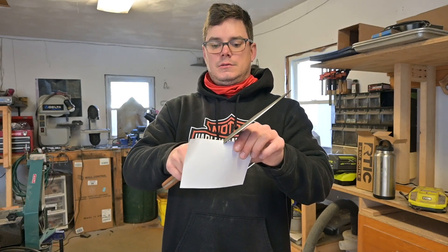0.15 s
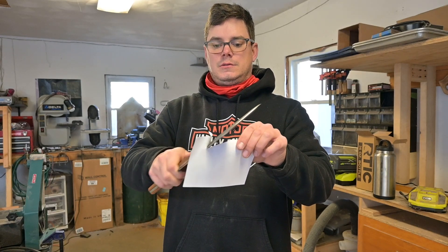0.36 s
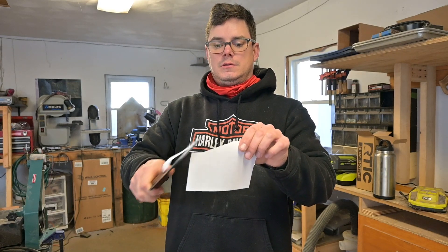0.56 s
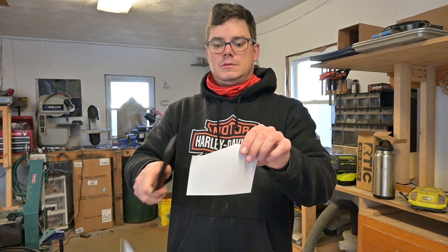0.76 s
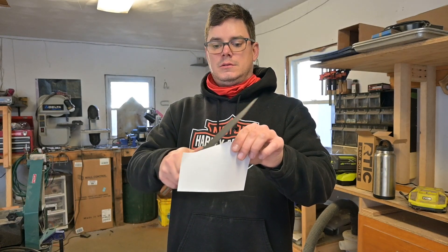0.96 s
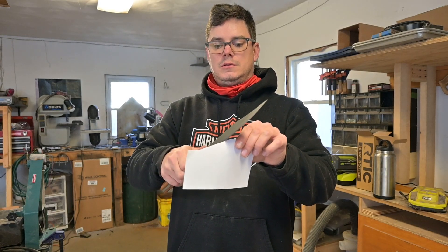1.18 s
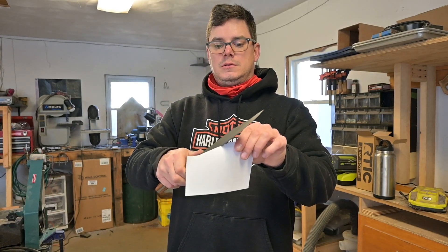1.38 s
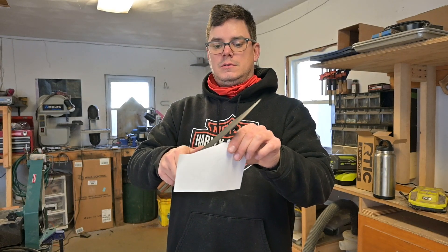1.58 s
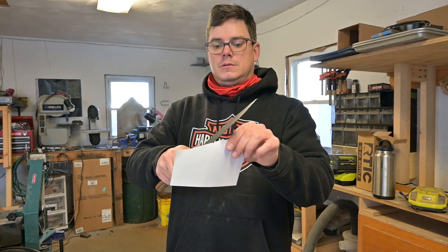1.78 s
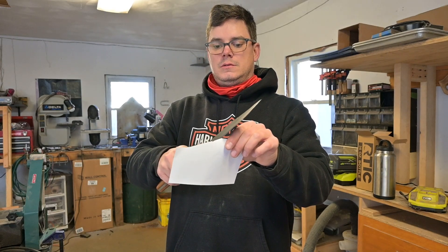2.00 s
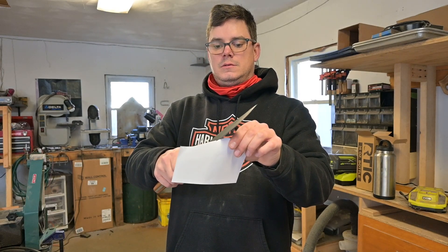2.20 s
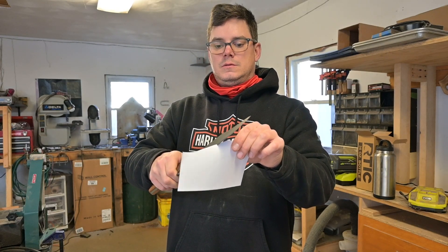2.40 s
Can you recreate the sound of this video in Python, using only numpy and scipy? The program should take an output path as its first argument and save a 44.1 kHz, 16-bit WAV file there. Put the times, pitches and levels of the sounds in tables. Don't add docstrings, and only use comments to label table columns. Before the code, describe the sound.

A knife slices a held sheet of paper, its crisp hiss swelling into a sharp rip; after a quiet gap come softer sawing strokes and papery knocks, close microphone in a quiet workshop.

```python
import sys
import numpy as np
from scipy import signal
from scipy.fft import rfft, irfft, next_fast_len
from scipy.io import wavfile
from scipy.ndimage import uniform_filter1d

SR = 44100
rng = np.random.default_rng(int(sys.argv[2]) if len(sys.argv) > 2 else 0)


def natural_amplitude(level_db):
    exponent = np.asarray(level_db, float) / 20
    return 10 ** exponent


def output_pcm(signal):
    pcm = np.clip(np.atleast_2d(signal).T, -1, 1) * 32767
    wavfile.write(sys.argv[1], SR, np.round(pcm).astype(np.int16))


N = 108045


def unit(x):
    return x / np.sqrt(np.mean(x ** 2) + 1e-20)


def along(points, hz):
    f, value = np.transpose(points)
    return np.interp(np.log(hz + 1), np.log(f + 1), value)


def filtered(x, response):
    m = next_fast_len(N + 8192)
    return irfft(rfft(x, m) * response(np.fft.rfftfreq(m, 1 / SR)), m)[..., :N]


def moving(x, gain_db):
    hz, s, z = signal.stft(x, SR, nperseg=256, noverlap=192)
    z = z * natural_amplitude(gain_db(hz[:, None] + 1, s))
    return signal.istft(z, SR, nperseg=256, noverlap=192)[1][:N]


def patches(shape):
    field = uniform_filter1d(rng.standard_normal(shape), size=5, axis=0)
    return unit(uniform_filter1d(field, size=8, axis=1))


def crackle(rate_hz, spike_db):
    hit = rng.random(N) < rate_hz / SR
    size = np.minimum(rng.exponential(size=N), 3)
    clicks = unit(hit * rng.standard_normal(N) * natural_amplitude(spike_db * size))
    return unit(clicks + 1.1 * rng.standard_normal(N))


def ringing(x, modes):
    def response(f):
        total = 1
        for hz, width_hz, db in modes:
            damping = 1j * f * width_hz
            total = total + natural_amplitude(db) * damping / (hz * hz - f * f + damping)
        return total
    return filtered(x, response)


def blade():
    # t/s, pressure level/dB, keenness/dB per octave
    strokes = [
        [(0.0, -41.5, -3.5), (0.038, -38.5, -3), (0.096, -39.5, -1), (0.176, -30.5, -3), (0.192, -33.5, -1),
         (0.3, -27.5, 3)],
        [(0.3, -27, 3), (0.34, -25.5, 4.5), (0.412, -27.5, 0.5), (0.446, -25.5, -0.5)],
        [(0.446, -22, -4.5), (0.48, -18.5, -1.5), (0.533, -18.5, 1.5), (0.537, -23, 0), (0.546, -24, -9.5)],
        [(1.128, -73, -2), (1.136, -46.5, 0), (1.17, -43.5, -1), (1.208, -36, 2), (1.268, -44.5, -1.5),
         (1.314, -33, 1.5), (1.34, -44, 5.5)],
        [(1.34, -43, -1), (1.376, -39, 5), (1.396, -53, -12), (1.408, -39.5, 3), (1.49, -37, 0),
         (1.502, -46, -2), (1.58, -60, -12)],
        [(2.06, -66.5, 7), (2.078, -49.5, -2.5), (2.156, -37, 0.5), (2.21, -40.5, 2.5), (2.3, -36, 0),
         (2.305, -55, -6), (2.33, -48, -40)],
        [(2.335, -87.5, 12), (2.341, -33.5, 1.5), (2.373, -44, -1.5), (2.377, -49, -1), (2.396, -60, -1),
         (2.402, -33, -10), (2.421, -46.5, 3.5), (2.429, -57.5, -4), (2.45, -64.5, 0.5)],
    ]
    rates_hz, spikes_db = [9000, 9150, 6000, 2920, 3090, 4280, 2530], [1.8, 1.8, 1.2, 2.2, 2.2, 2.2, 1.5]
    # f/Hz, level/dB
    fibre, rip, saw = [(150, -28), (400, -9.5), (900, -2), (2200, 4.5), (4500, 0.5), (8500, -1.5),
                       (13000, -9), (16000, -16.5)], [(300, -25.5), (1000, -3), (1700, -6), (2400, -1), (6000, 1),
                                      (8500, -1.5), (16000, -13)], [(300, -7.5), (900, 3), (2100, 4), (3000, -3.5),
                                                   (6000, -1), (8700, -3), (12500, -11.5), (16000, -16)]
    # f/Hz, width/Hz, level over the fibre noise/dB
    drawn, ripped, sawn = [(1550, 370, -4), (2100, 150, -6), (3850, 120, 1), (4590, 200, -0.5)], [(2390, 110, 4), (3820, 83, 0.93), (5500, 91, 0.78),
                                          (6140, 200, 0.7)], [(960, 180, -2.5), (2100, 63, 4.5), (2644, 89, 3),
                                                          (3814, 360, -0.5), (6180, 190, -12),
                                                          (8740, 620, -5)]
    grains = [fibre] * 2 + [rip] + [saw] * 4
    mode_sets = [drawn] * 2 + [ripped] + [sawn] * 4
    pivot_hz, patchy_db, keenest_db = 4000, 2.5, 5
    out, t = np.zeros(N), np.arange(N) / SR
    for rows, rate_hz, spike_db, grain, modes in zip(strokes, rates_hz, spikes_db, grains, mode_sets):
        s, level_db, keen_db = np.transpose(rows)
        keen_db = np.clip(keen_db, -keenest_db, keenest_db)

        def colour(f, u):
            octaves = np.log2(np.maximum(f, 1500) / pivot_hz)
            tilt_db = np.interp(u, s, keen_db) * octaves
            return along(grain, f) + tilt_db + patchy_db * patches((len(f), len(u)))

        cut = ringing(moving(crackle(rate_hz, spike_db), colour), modes)
        out += natural_amplitude(np.interp(t, s, level_db, -150, -150)) * cut
    return out


def singing(rows, width, rate_hz, spike_db):
    s, hz, level_db = np.transpose(rows)

    def band(f, u):
        pitch_hz = np.interp(u, s, hz)
        offset = np.log(f / pitch_hz) / width
        power_db = np.interp(u, s, level_db, -150, -150) - 10 * np.log10(pitch_hz * width / SR)
        return power_db - 40 * np.log10(1 + offset ** 2)

    return moving(crackle(rate_hz, spike_db), band)


def sheet_tones():
    # t/s, pitch f/Hz, level/dB
    belly, steel_edge, cut_strip = [(0, 2200, -50), (.1, 1900, -42), (.15, 1800, -34.5), (.18, 1400, -33),
                                    (.22, 1050, -42.5), (.26, 900, -47.5)], [(0, 13700, -61.5), (.17, 13000, -47), (.28, 12740, -34.5),
                                                 (.32, 12600, -45), (.4, 13060, -38), (.45, 12900, -45)], [(.3, 15900, -41.5), (.335, 15100, -34),
                                                               (.37, 11900, -34), (.4, 9500, -36),
                                                               (.44, 8850, -32.5), (.452, 6400, -40.5),
                                                               (.47, 5000, -56)]
    tones = singing(belly, .38, 784, 2) + singing(steel_edge, .11, 6500, 2)
    return tones + singing(cut_strip, .08, 8000, 2)


def snaps():
    # t/s, peak level/dB, sizzle over body/dB
    last_fibres = [
        (.4361, -17, -2),
        (.4399, -17, 2),
        (.4979, -7, -9),
        (.5016, -13, -9),
        (.5057, -12, -11),
        (.5337, -12, -13),
        (.5403, -11, -9),
    ]
    sawn_creases = [(1.1366, -40.0, -10.0), (1.1534, -36.0, -8.0), (1.158, -35.0, -5.0),
                    (1.1911, -32.0, -7.0), (1.2183, -29.0, -10.0), (1.2627, -29.0, -13.0),
                    (1.2699, -32.0, 1.0), (1.2813, -30.0, -10.0), (1.3071, -25.0, -3.0),
                    (1.3153, -27.0, -7.0), (1.3325, -29.0, -2.0), (1.3372, -26.0, -11.0),
                    (1.3534, -28.0, 0.0), (1.3699, -21.0, 5.0), (1.381, -32.0, 2.0), (1.4034, -31.0, 4.0),
                    (1.4117, -29.0, -4.0), (1.4183, -29.0, 8.0), (1.4229, -26.0, 2.0),
                    (1.4376, -29.0, -3.0), (1.4651, -28.0, -2.0), (1.4801, -26.0, 1.0),
                    (1.4861, -22.0, -7.0), (1.7002, -31.0, -5.0), (1.7046, -41.0, -2.0),
                    (2.0498, -44.0, 2.0), (2.0773, -42.0, -13.0), (2.1003, -36.0, -3.0),
                    (2.1316, -28.0, -12.0), (2.1564, -30.0, -12.0), (2.1862, -28.0, -10.0),
                    (2.1965, -30.0, -10.0), (2.2596, -29.0, -5.0), (2.2646, -28.0, -12.0),
                    (2.2848, -31.0, -8.0), (2.2968, -28.0, 2.0), (2.3028, -36.0, -5.0)]
    knocks = [
        (2.3422, -26.0, 1.0),
        (2.3463, -30.0, -10.0),
        (2.3505, -28.0, 0.0),
        (2.3572, -25.0, -6.0),
        (2.3612, -29.0, -11.0),
        (2.3667, -32.0, -6.0),
        (2.3725, -33.0, -10.0),
        (2.4034, -29.0, -6.0),
        (2.4102, -35.0, -11.0),
        (2.4162, -36.0, -10.0),
    ]
    ring_hz = [3600, 7800, 12800]
    # f/Hz, level/dB
    crease = [(300, -22), (1500, -3), (2500, 0), (16000, 0)]
    ring_t60_s, rag_t60_s, rag_db, spread = .0018, .025, -21, .06
    out, t = np.zeros(N + SR), np.arange(1500) / SR
    for s, db, sizzle_db in last_fibres + sawn_creases + knocks:
        hz = ring_hz * np.exp(spread * rng.standard_normal(3))
        share = natural_amplitude([0, sizzle_db / 2 - 4.5, sizzle_db])
        phase = 2 * np.pi * rng.random((3, 1))
        ring = share / share.sum() @ np.sin(2 * np.pi * np.outer(hz, t) + phase)
        ring = ring * natural_amplitude(-60 * t / ring_t60_s)
        rag = rng.standard_normal(len(t)) * natural_amplitude(rag_db - 60 * t / rag_t60_s)
        out[round(s * SR) - 4:][:len(t)] += natural_amplitude(db) * (ring / np.abs(ring).max() + rag)
    return filtered(out[:N], lambda f: natural_amplitude(along(crease, f)))


def clumps(rows, rate_hz, cycles, spread, spike_db):
    out, t = np.zeros(N + SR), np.arange(1500) / SR
    for s, length_s, level_db, pitch_hz in rows:
        when, tone, size = rng.random((3, 400))
        hz = pitch_hz * np.exp(spread * np.sqrt(3) * (2 * tone - 1))
        hz = np.minimum(hz, 16000)[:, None]
        live = np.arange(400) < rate_hz * length_s + 2
        gain = live * natural_amplitude(-spike_db * np.log(size + 0.055)) * np.sin(np.pi * when) ** .5
        decay, onset = np.exp(-t * hz / cycles), 1 - np.exp(-t * hz * 2)
        wave = gain[:, None] * np.sin(2 * np.pi * hz * t) * decay * onset
        at = ((s + when * length_s) * SR).astype(int)[:, None] + np.arange(len(t))
        burst = np.bincount(at.ravel(), wave.ravel(), N + SR)
        out += natural_amplitude(level_db) * burst * np.sqrt(length_s * SR / np.sum(burst ** 2))
    return out[:N]


def buckles():
    # t/s, length/s, level/dB, pitch f/Hz
    bends = [(.44, 0.11, -39.5, 604), (.475, 0.046, -30, 2640), (.547, 0.015, -24, 2840),
             (.548, 0.015, -28, 1255), (.573, .004, -30, 1890), (.622, 0.022, -48.5, 990),
             (1.2, 0.042, -41.5, 1236), (1.31, 0.03, -48.5, 890), (1.35, 0.02, -43, 1440),
             (1.46, 0.031, -45, 2100), (1.518, .025, -39.5, 1180), (2.11, 0.16, -46.5, 1950),
             (2.18, 0.13, -46.5, 1180), (2.316, 0.0074, -56, 1550), (2.34, .035, -43, 1400),
             (2.397, 0.0085, -31.5, 1080), (2.406, 0.014, -38, 1420),
             (.475, .065, -48, 220),
        (2.399, .008, -45, 380),
        (2.343, .02, -49, 550),
        (.49, .046, -26, 5700),
        (.62, .02, -55, 280),
        (1.185, .03, -54, 550),
        (1.701, .012, -53, 2500),
    ]
    return clumps(bends, 1800, 2.5, .25, 3.5)


def pops():
    # t/s, peak level/dB, pitch f/Hz
    dents = [(1.6998, -27, 1900), (2.3424, -25, 1250), (2.3501, -26, 1250), (2.3568, -22, 1800),
             (2.3664, -29, 1800), (2.372, -33, 1500), (2.3978, -29, 950), (2.4031, -20, 1200),
             (2.4096, -24, 1600), (2.4142, -29, 1500), (2.4175, -30, 1100)]
    out, t = np.zeros(N + SR), np.arange(600) / SR
    for s, db, hz in dents:
        swing = -np.sin(2 * np.pi * hz * t) * np.exp(-t * hz / 0.9)
        out[round(s * SR):][:len(t)] += natural_amplitude(db) * swing / np.abs(swing).max()
    return out[:N]


def rustles():
    # t/s, length/s, level/dB, pitch f/Hz
    brushes = [(.68, .028, -53, 12300), (.7, .047, -61, 8700), (.71, .02, -66, 13000),
               (1.548, .027, -54, 10100), (1.627, .014, -58, 10500), (1.642, .018, -56, 9500),
               (1.648, .04, -61, 6500), (1.7, .03, -58, 6000), (1.71, .18, -65, 8000),
               (2.043, .01, -60, 8500), (2.068, .014, -58, 6000)]
    return clumps(brushes, 5960, 2.1, 0.39, 2)


def shop(x):
    # f/Hz, t60/s
    t60 = [(200, 0.49), (2000, 0.33), (10000, 0.3)]
    hz, t, z = signal.stft(rng.standard_normal(SR // 2), SR, nperseg=256)
    z = z * natural_amplitude(-60 * t / along(t60, hz)[:, None])
    tail = signal.istft(z, SR, nperseg=256)[1]
    delayed = np.pad(x, (200, 0))
    return natural_amplitude(-8.5) * signal.fftconvolve(delayed, tail / np.linalg.norm(tail))[:N]


def port_colour(direct, aside):
    # f/Hz, level/dB
    port = [(60, -50.5), (200, -5.5), (7000, -1), (9000, 0.5), (10700, -10), (12000, 1.5), (13000, 0),
            (15000, -1.5)]
    sideways_db = -3

    def side(f):
        db = along(port, f)
        return natural_amplitude(np.where(f > 5000, np.maximum(db, sideways_db), db))

    return filtered(direct, lambda f: natural_amplitude(along(port, f))) + filtered(aside, side)


def heater():
    # f/Hz, level/dB
    air_spectrum, hiss_spectrum = [(25, -36), (50, -25.5), (120, -22.5), (240, -20), (300, -14), (650, -13),
                                   (850, -5.5), (1200, -12.5), (2500, -21), (4000, -48.5)], [(1180, -38), (2000, -20), (2570, -4.5), (3010, -2),
                                                   (7980, -10.5), (14700, -14), (16000, -16.5)]
    air = moving(rng.standard_normal(N), lambda f, u: 0.81 * patches((len(f), len(u))))
    air = unit(filtered(air, lambda f: natural_amplitude(along(air_spectrum, f))))
    hiss = unit(filtered(rng.standard_normal(N), lambda f: natural_amplitude(along(hiss_spectrum, f))))
    return natural_amplitude(-54) * air + natural_amplitude(-67) * hiss


def mains():
    # f/Hz, level/dB
    harmonics = [(120, -78.5), (240, -70)]
    t = np.arange(N) / SR
    return sum(natural_amplitude(db) * np.sin(2 * np.pi * hz * t) for hz, db in harmonics)


def port_noise():
    def rumble_shape(f):
        return 1 / (1 + (f / 500) ** 2) * (f / (f + 150)) ** 3
    rumble = unit(filtered(rng.standard_normal(N), rumble_shape))
    return natural_amplitude(-105) * rumble + natural_amplitude(-70.5) * rng.standard_normal(N)


def two_ports(x):
    # f/Hz, left lead/rad
    lead = [(4000, 0), (6000, -0.17), (7400, -0.19), (8600, -0.3), (10800, -0.18), (11900, -0.38),
            (13400, -.45), (16000, -0.24)]
    sides = np.array([[1], [-1]])
    return filtered(x, lambda f: np.exp(.5j * along(lead, f) * sides)) + port_noise() * sides


def scene():
    paper = blade() + sheet_tones() + snaps() + buckles() + pops()
    aside = shop(paper) + rustles()
    return two_ports(port_colour(paper, aside) + heater() + mains())


def roll_off(x):
    return signal.sosfilt(signal.butter(12, 16470, fs=SR, output="sos"), x)


def record(dry):
    mix = filtered(dry, lambda f: f < 15800)
    return roll_off(mix)


dry = scene()
out = record(dry)
output_pcm(out)
```